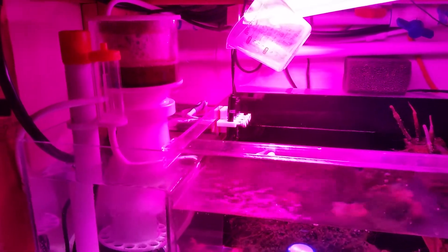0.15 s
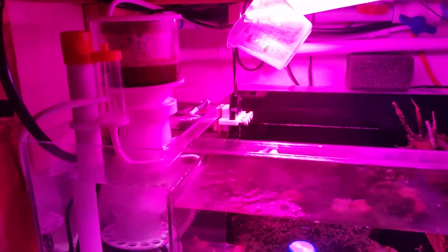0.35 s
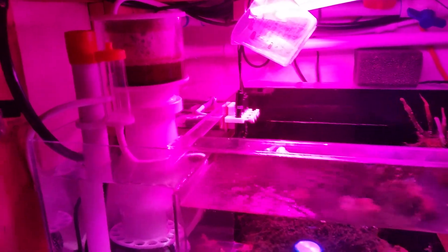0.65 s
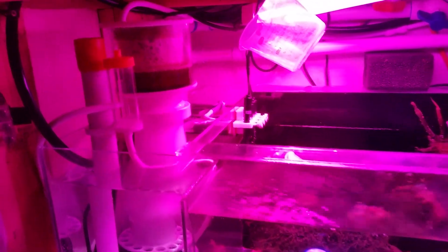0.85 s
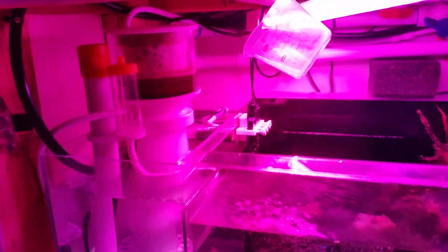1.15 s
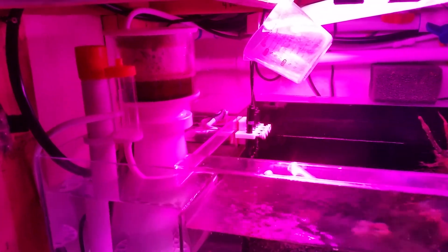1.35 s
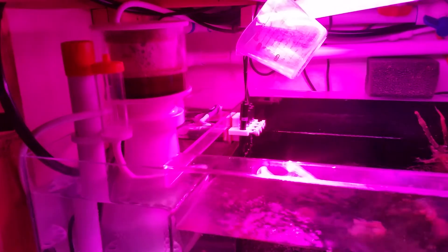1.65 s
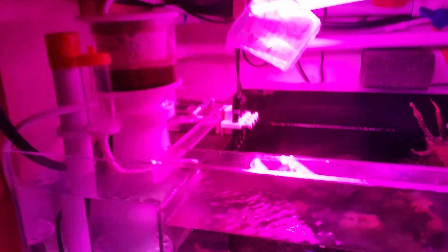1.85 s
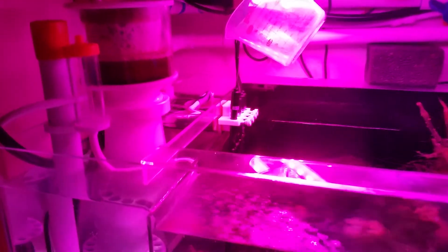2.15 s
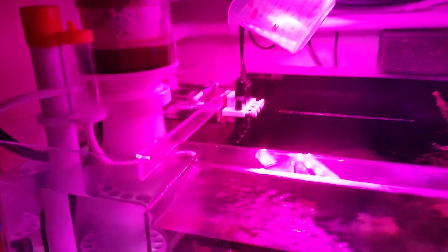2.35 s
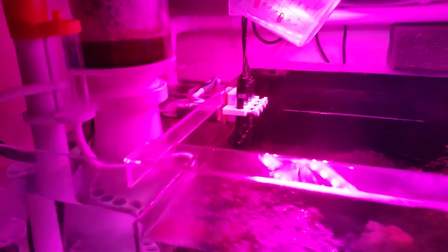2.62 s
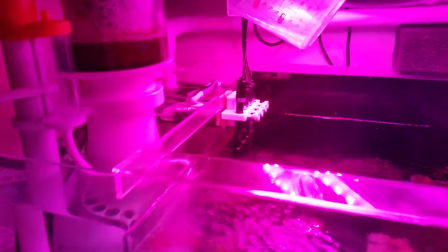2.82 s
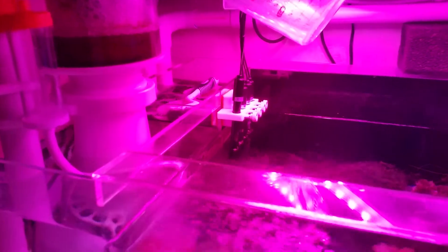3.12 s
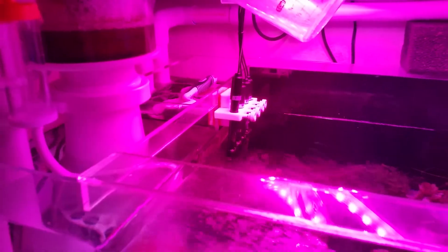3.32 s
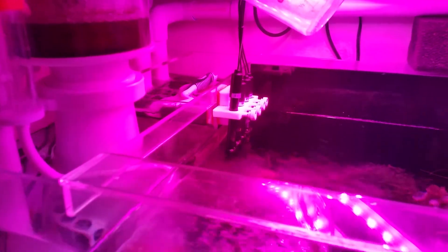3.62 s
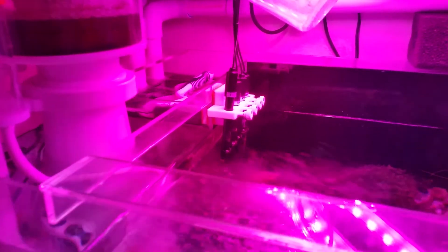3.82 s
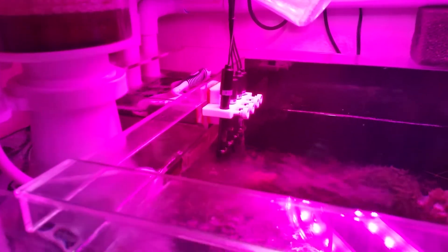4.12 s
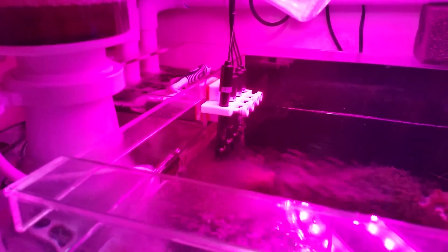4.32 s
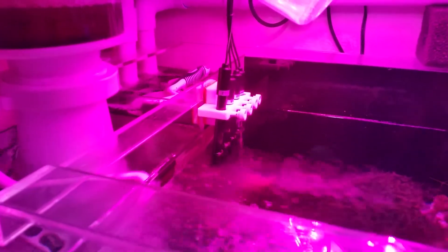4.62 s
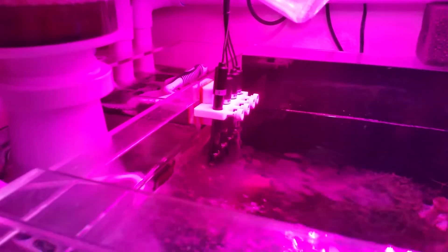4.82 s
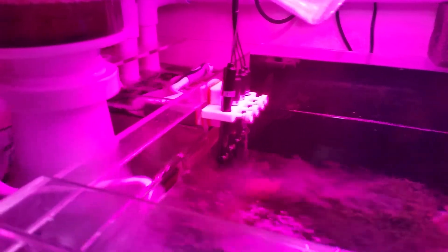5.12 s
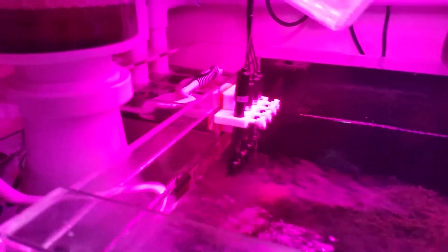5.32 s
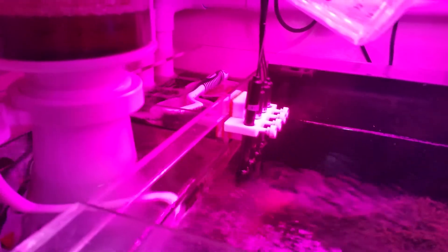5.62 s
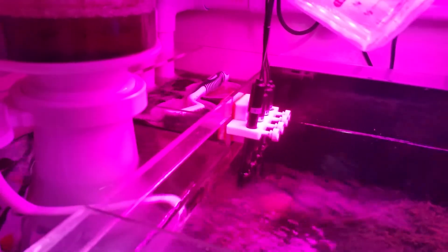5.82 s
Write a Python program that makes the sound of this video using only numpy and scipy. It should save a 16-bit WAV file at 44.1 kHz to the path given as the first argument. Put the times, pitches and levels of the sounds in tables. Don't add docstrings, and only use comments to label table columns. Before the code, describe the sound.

Aquarium pumps hum with a slow throbbing beat over washing, fizzing water, with soft handling bumps and one loud sharp pop near one second.

```python
import sys
import numpy as np
from scipy import signal
from scipy.io import wavfile
from scipy.ndimage import uniform_filter1d

SR = 44100
rng = np.random.default_rng(int(sys.argv[2]) if len(sys.argv) > 2 else 0)


def nominal_scale(level):
    x = np.asarray(level, float) / 20
    return 10 ** x


def waveform_to_disk(signal):
    frames = np.transpose(np.atleast_2d(signal))
    scaled = np.clip(frames, -1, 1) * 32767
    samples = np.round(scaled).astype(np.int16)
    wavfile.write(sys.argv[1], SR, samples)


N = 263277

# (time [s], distance [0 near - 1 far], pump level [dB])
CAMERA_PATH = [
    (0, 0.75, -7.5),
    (.5, 0.7, -7.5),
    (1, 0.72, -5),
    (1.45, 1.19, -9),
    (1.95, 1.18, -4.5),
    (2.5, .54, -5),
    (3.2, 0.48, -2.5),
    (4, .17, -0.7),
    (5.4, 0.03, 0),
    (6, -0.086, 3),
]
# (frequency [Hz], left level [dB per Hz], right level [dB per Hz])
WASH_SPECTRUM = [(20, -100, -107), (47.5, -61.5, -57.5), (91, -59, -61), (155, -59.5, -58.5),
                 (216, -73.5, -76), (330, -76.5, -73), (397, -77.5, -75.5), (760, -80.5, -83),
                 (1020, -78, -87), (1900, -84.5, -82.5), (2060, -85.5, -88.5), (2810, -85, -97),
                 (3330, -90, -100), (4300, -110, -110)]
# (frequency [Hz], left level [dB per Hz], right level [dB per Hz])
FIZZ_SPECTRUM = [(3000, -110, -110), (3540, -96, -101), (4050, -79, -96), (4230, -78.5, -99),
                 (5250, -82, -101), (6360, -89.5, -104), (7740, -99, -102), (9330, -91, -91.5),
                 (11240, -91, -84), (12500, -93, -88.5), (13800, -92, -92), (15000, -99, -89),
                 (16400, -99, -86)]
# (frequency [Hz], left change [dB], right change [dB])
DISTANCE_CHANGE = [(39.7, -7.5, -6.5), (206, 1, -2), (395, -1.5, -10), (1190, -4, -4), (1900, -2, -3),
                   (2200, -10.5, -7.5), (2750, -2, -3), (3500, -10, -5.5), (4530, 2.6, -15),
                   (6300, -15, -17.5), (11000, -10.5, -11), (15000, -11, -13)]
# (frequency [Hz], likeness [0-1])
COHERENCE = [(50, 0.34), (130, 0.82), (290, 1), (640, 0.91), (1400, 0.31), (2500, 0.29), (3500, .02),
             (15000, 0.022)]
# (frequency [Hz], width [Hz], left level [dB], right level [dB], change at distance 1 [dB])
PIPE_MODES = [(475.6, 49, -51.5, -58.5, -30), (336, 15, -65.5, -63.5, 4.5), (287, 20, -67, -70, 7.5),
              (1727, 61, -62, -58.5, -13), (1081, 35, -71, -57.5, -17), (11340, 280, -89, -71, -15),
              (4920, 150, -67, -72.5, -5)]
# (time [s], level [dB], direction [+1 or -1], share reaching right port [0-1])
FINGER_PUSHES = [(.0825, -29, 1, 1), (.487, -24, 1, 0), (.4955, -19, -1, 0), (.4995, -14, 1, 0),
                 (1.414, -13, 1, .1), (1.584, -19, 1, 0), (2.776, -20, 1, 0), (3.194, -20, -1, .2),
                 (3.2675, -20, -1, .85), (3.272, -19, 1, .85), (3.499, -21, 1, 0), (3.539, -22, 1, 0),
                 (3.9128, -11, 1, .1), (3.966, -21, -1, .1), (3.9685, -20, 1, .3), (4.0245, -17, 1, .55),
                 (4.217, -20, 1, 0), (4.664, -15, 1, .2), (4.941, -21, 1, .3), (5.547, -21, 1, .2),
                 (5.613, -21, 1, .2), (5.746, -18, -1, .3), (5.764, -18, 1, .6), (5.797, -16, 1, .2),
                 (5.943, -23, 1, .8)]
# (time [s], level [dB], frequency [Hz], decay by 60 dB [s])
LARGE_BUBBLES = [(2.915, -41, 310, .07), (3.105, -41, 450, .05), (3.115, -43, 650, .03),
                 (3.16, -49, 1300, .16), (3.265, -43, 780, .03), (3.785, -42, 700, .015),
                 (3.905, -37, 500, .03), (3.963, -43, 730, .03), (4.017, -38, 740, .045),
                 (4.39, -42, 480, .12), (4.95, -38, 330, .04), (5.23, -42, 450, .1),
                 (5.46, -38, 1065, .065), (5.77, -41, 450, .07), (5.812, -48, 2050, .05),
                 (5.825, -47, 1350, .07)]
# (time [s], level [dB], frequency [Hz], length [s], left minus right [dB])
SPRAYS = [
    (0.369, -56, 10200, 0.031, -4),
    (0.994, -53, 11000, .003, 6),
    (1.95, -60.5, 11400, .02, -5),
    (2.58, -54, 13200, .012, -2.1),
    (4.502, -53, 10500, 0.025, -1),
    (4.59, -54, 12000, .05, -5),
    (5.5, -50, 9900, .05, 1),
    (5.757, -54, 11000, 0.029, -3.),
    (5.813, -50, 1600, 0.029, 9),
]
# (time [s], level [dB])
SKIN_POPS = [
    (.9877, -16.5),
    (1.0215, 12.9),
]

MAINS_HZ = 60.016 * np.array([2, 3, 4])
SHAFT_HZ = 44.578 * np.array([1, 2, 3, 12, 15, 21, 24, 25, 27, 33])
WHINE_HZ = 580.4 * np.array([1, 2, 3])
LAMP_HZ = np.array([13120, 13293, 14501, 14675])
# (left level [dB], right level [dB], left change at distance 1 [dB], right change at distance 1 [dB])
MAINS_LEVELS = [(-37.5, -38, 1.5, 3.5), (-53, -45, 4.2, -5.5), (-69, -58, 3.5, 6.5)]
SHAFT_LEVELS = [(-80, -72, -10, 25), (-48, -63, -1, 1), (-40, -38, 2.8, -3), (-51.5, -56, -3.5, 4.5),
                (-78, -95, 9, 2), (-64.5, -84, -2, 9), (-83, -66, -23, -21), (-92, -61, -9, 0),
                (-80, -70, -20, -8), (-65, -61, 2, 0)]
WHINE_LEVELS = [(-60, -60, 0, 1.5), (-57.5, -79, -8.5, -5), (-59, -76.5, -6.5, -9)]
LAMP_LEVELS = [(-84, -95, 0, 0), (-84, -95, 0, 0), (-88, -95, 0, 0), (-88, -95, 0, 0)]

BEAT_S = 4.0171
LEFT_LAG_S = 15 / SR


def evened(x):
    return x / np.sqrt(np.mean(x ** 2, axis=-1, keepdims=True) + 1e-20)


def read(points, hz):
    f, *columns = np.transpose(points)
    return np.array([np.interp(np.log(hz + 1), np.log(f + 1), c) for c in columns])


def along(points, t):
    s, *columns = np.transpose(points)
    return [np.interp(t, s, c) for c in columns]


def add(mix, s, sound):
    part = mix[:, round(s * SR):][:, :sound.shape[1]]
    part += sound[:, :part.shape[1]]


def stereo(left, right):
    return np.array([[left], [right]])


def panned(db, pan_db):
    return nominal_scale(db + stereo(pan_db / 2, -pan_db / 2))


def slow_drift(top_hz, t):
    total = 0
    for f in np.geomspace(top_hz / 20, top_hz, 12):
        total = total + np.sin(2 * np.pi * (f * t + rng.random())) / np.sqrt(f)
    return evened(total)


def resonance(x, hz, width):
    return signal.lfilter(*signal.iirpeak(hz, hz / width, SR), x)


def ringing_noise(length, hz, width):
    noise = rng.standard_normal((2, length))
    return evened(resonance(resonance(noise, hz, width), hz, width))


def water(spectrum, drive, size, patchy_db, flicker_db):
    overlap = size * 3 // 4
    hz, t, (left, other) = signal.stft(drive, SR, nperseg=size, noverlap=overlap)
    same = np.clip(read(COHERENCE, hz)[0], -1, 1)[:, None]
    lead = np.exp(2j * np.pi * hz * LEFT_LAG_S)[:, None]
    right = same * left * lead + np.sqrt(1 - same ** 2) * other
    patches = uniform_filter1d(rng.standard_normal(left.shape), size // 64, 0)
    patches = uniform_filter1d(patches, 8192 // size, 1)
    field_db = patchy_db * patches / patches.std() + flicker_db * slow_drift(23.93, t)
    far = along(CAMERA_PATH, t)[0]
    level_db = read(spectrum, hz)[:, :, None] + read(DISTANCE_CHANGE, hz)[:, :, None] * far
    z = np.array([left, right]) * nominal_scale(level_db + field_db) * np.sqrt(SR / 2)
    return signal.istft(z, SR, nperseg=size, noverlap=overlap)[1][:, :N]


def wash():
    return water(WASH_SPECTRUM, rng.standard_normal((2, N)), size=2048, patchy_db=1.5, flicker_db=0.1)


def fizz():
    burst_db = 2.8 * np.minimum(rng.exponential(1, N), 4)
    happens = rng.random(N) < 1500 / SR
    bursts = rng.standard_normal((2, N)) * nominal_scale(burst_db) * happens
    drive = evened(rng.standard_normal((2, N)) + 0.45 * evened(bursts))
    return water(FIZZ_SPECTRUM, drive, size=256, patchy_db=0.92, flicker_db=-0.2)


def pipes():
    far = along(CAMERA_PATH, np.arange(N) / SR)[0]
    out = np.zeros((2, N))
    for hz, width, left_db, right_db, far_db in PIPE_MODES:
        out += nominal_scale(stereo(left_db, right_db) + far_db * far) * ringing_noise(N, hz, width)
    return out


def bubble(hz, t60):
    t = np.arange(0, t60, 1 / SR)
    envelope = nominal_scale(-60 * t / t60) * (1 - np.exp(-t / .002))
    return envelope * np.sin(2 * np.pi * hz * t * (1 + .02 * t / t60))


def bubbles():
    out = np.zeros((2, N))
    for s, db, hz, t60 in LARGE_BUBBLES:
        left_db = 2.5 * np.log2(1800 / hz)
        add(out, s, panned(db, left_db) * bubble(hz, t60))
    for when, pitch, size, side in rng.random((240, 4)):
        hz = 220 * 5 ** pitch
        small_db = -46 - 16 * pitch - 12 * size
        add(out, when * N / SR, panned(small_db, 8 * side - 4) * bubble(hz, 35 / hz))
    return out


def splashes():
    out = np.zeros((2, N))
    t = np.arange(SR // 10) / SR
    for s, db, hz, length, pan_db in SPRAYS:
        spray = ringing_noise(SR // 10, hz, width=870 + 0.12 * hz)
        add(out, s, panned(db, pan_db) * spray * np.sin(np.pi * np.clip(t / length, 0, 1)))
    return out


def handling():
    small = []
    for when, size, side in rng.random((70, 3)):
        s = when * N / SR
        small.append((s, -37 + 1.2 * s + 7 * size, np.sign(side - .5), .15))
    rate = np.zeros((2, N))
    rise = np.hanning(round(3.44 * SR / 1000) + 3)
    for s, db, direction, right in FINGER_PUSHES + small:
        add(rate, s + 0.00097, direction * nominal_scale(db) * stereo(1, right) * rise / rise.sum())
    steps = np.cumsum(rate, axis=1)
    for hz, q in ((40., .75), (72., 1.15)):
        w = np.tan(np.pi * hz / SR)
        poles = [1 + w / q + w * w, 2 * (w * w - 1), 1 - w / q + w * w]
        steps = signal.lfilter([1, -2, 1], poles, steps)
    return steps


def pops():
    swing_s, trough, creep_s = 0.00463, 0.26, 0.0016
    t = np.arange(SR // 20) / SR
    swing = (1 + trough) * np.clip(1 - t / swing_s, 0, 1) ** 2.5 - trough
    creep = np.exp(-(np.maximum(t - swing_s, 0) / creep_s) ** 1.4)
    edge = ramp(t, 0, 0.000265)
    tick = 0.12 * np.exp(-t / 0.00018) * np.sin(2 * np.pi * 11800 * t)
    out = np.zeros((2, N))
    for s, db in SKIN_POPS:
        add(out, s, nominal_scale(db) * stereo(0, 1) * (edge * swing * creep + tick))
    return out


def motor(tones_hz, levels, waver_ms, flutter_db, hum_share):
    t = np.arange(N) / SR
    coarse = t[::200]
    far, hum_db = along(CAMERA_PATH, t)
    clock = t - BEAT_S + waver_ms / 1000 * np.interp(t, coarse, slow_drift(1.484, coarse))
    clock = clock + stereo(0, LEFT_LAG_S)
    out = np.zeros((2, N))
    for hz, (left_db, right_db, *far_db) in zip(tones_hz, levels):
        flutter = flutter_db * np.interp(t, coarse, slow_drift(11, coarse))
        level_db = np.outer(far_db, far) + hum_share * hum_db + flutter + stereo(left_db, right_db)
        out += np.sqrt(2) * nominal_scale(level_db) * np.cos(2 * np.pi * hz * clock)
    return out


def lamp():
    return motor(LAMP_HZ, LAMP_LEVELS, waver_ms=.02, flutter_db=1, hum_share=0)


def skimmer():
    return motor(WHINE_HZ, WHINE_LEVELS, waver_ms=.12, flutter_db=2.4, hum_share=0)


def pumps():
    hum = motor(MAINS_HZ, MAINS_LEVELS, waver_ms=.05, flutter_db=.8, hum_share=1)
    impeller = motor(SHAFT_HZ, SHAFT_LEVELS, waver_ms=.2, flutter_db=1.7, hum_share=1)
    return hum + impeller


def scene():
    background = wash() + fizz() + pipes() + bubbles() + splashes()
    touches = handling() + pops()
    return background + touches + lamp() + skimmer() + pumps()


def ramp(t, start_s, length_s):
    return np.sin(np.pi / 2 * np.clip((t - start_s) / length_s, 0, 1)) ** 2


def gain_control_db():
    rest_db, early_s = 0.62, 0.021
    duck_db, fall_s, back_s = -18, 0.0047, 0.025
    step_db, sink_db, sink_wait_s, sink_fall_s = -4, -6, 0.29, 0.17
    hold_s, recover_s, linger_db, linger_s = 0.29, 0.5, -3.5, 1.
    t = np.arange(N) / SR - SKIN_POPS[-1][0] + early_s
    falling = np.clip(t / fall_s, 0, 1)
    duck = duck_db * falling * np.clip(1 - (t - fall_s) / back_s, 0, 1)
    release_s = sink_wait_s + sink_fall_s + hold_s
    down = (step_db - linger_db) * falling + sink_db * ramp(t, sink_wait_s, sink_fall_s)
    linger = linger_db * falling * (1 - ramp(t, release_s, linger_s))
    return rest_db + duck + down * (1 - ramp(t, release_s, recover_s)) + linger


def top_cut(x):
    return signal.sosfilt(signal.butter(12, 16850, fs=SR, output="sos"), x)


def record(dry):
    held = np.clip(dry * nominal_scale(gain_control_db()), -.9, .9)
    limit = signal.firwin(1023, 15830, window=("kaiser", 9), fs=SR)
    mix = signal.oaconvolve(held, limit[None], "same")
    return top_cut(mix)


dry = scene()
out = record(dry)
waveform_to_disk(out)
```